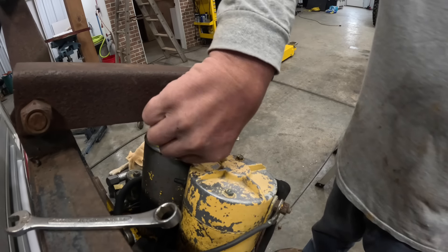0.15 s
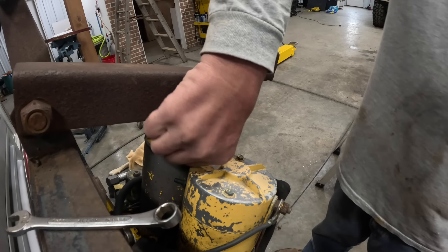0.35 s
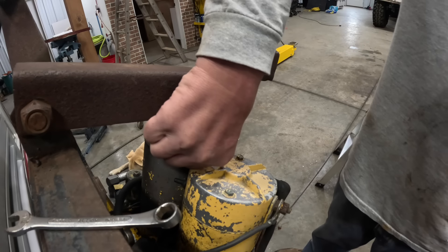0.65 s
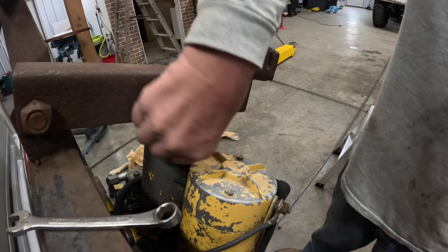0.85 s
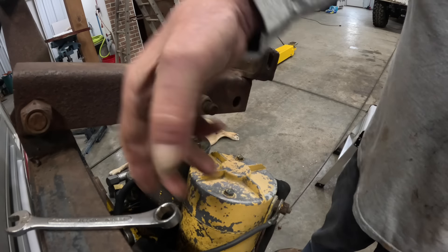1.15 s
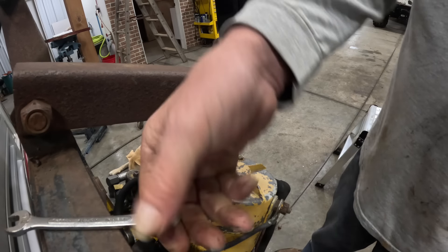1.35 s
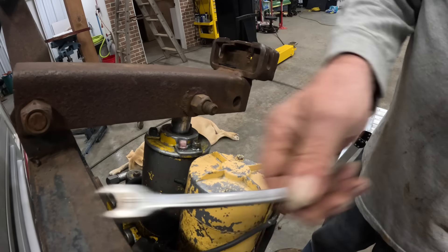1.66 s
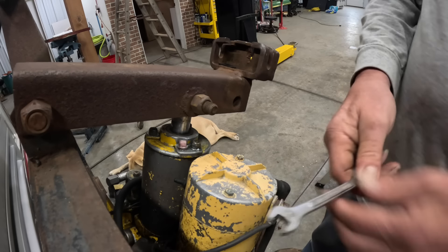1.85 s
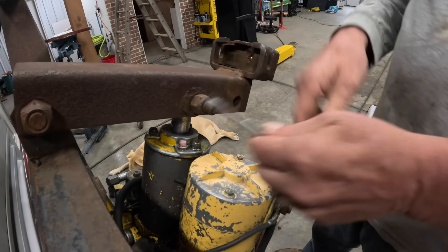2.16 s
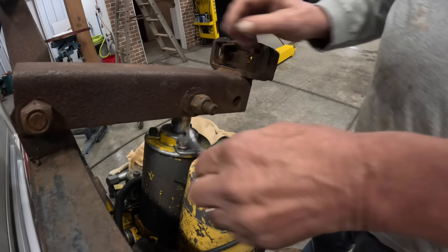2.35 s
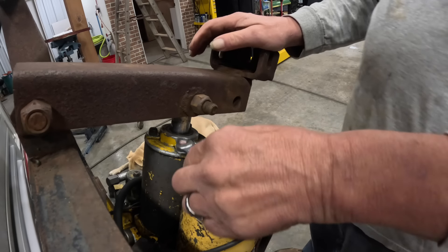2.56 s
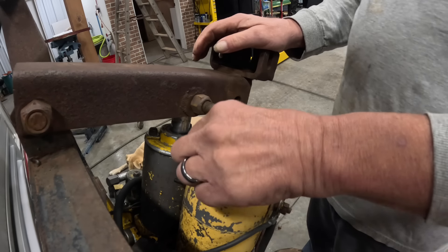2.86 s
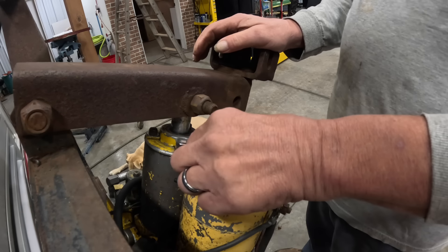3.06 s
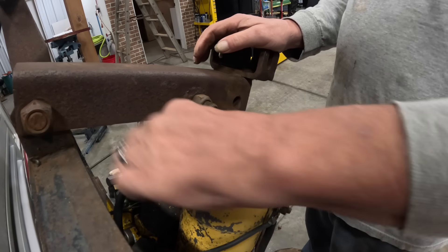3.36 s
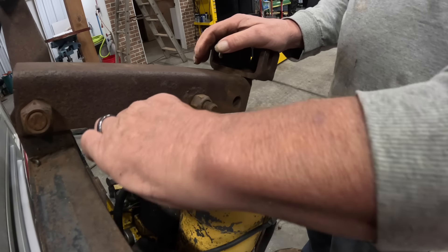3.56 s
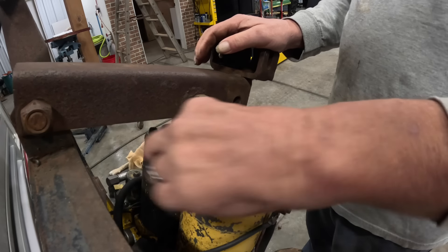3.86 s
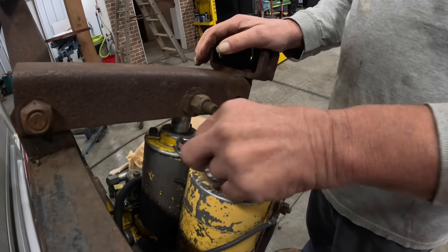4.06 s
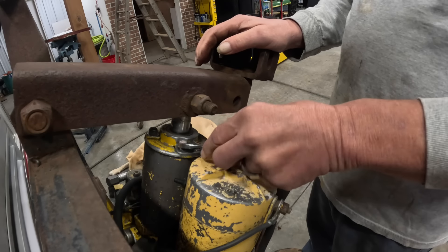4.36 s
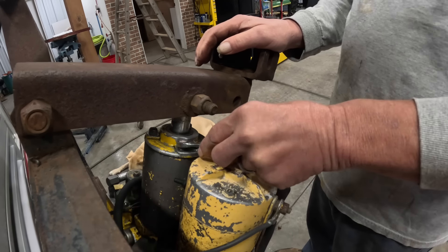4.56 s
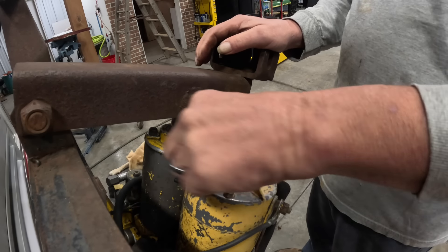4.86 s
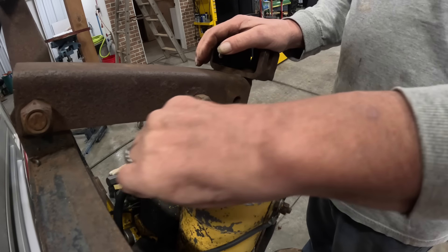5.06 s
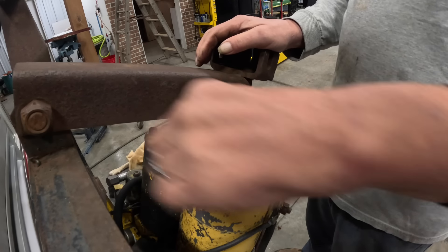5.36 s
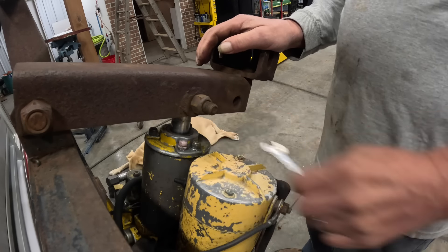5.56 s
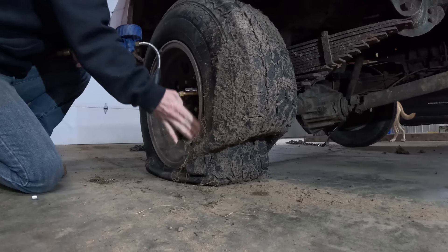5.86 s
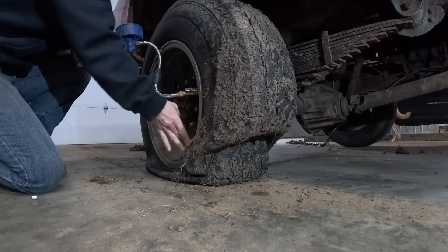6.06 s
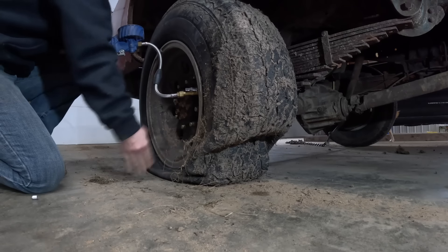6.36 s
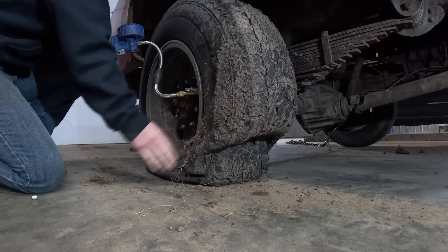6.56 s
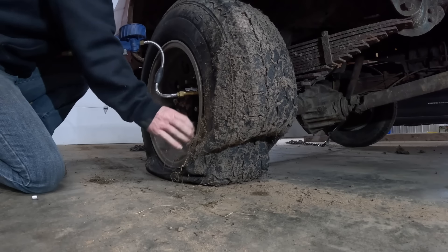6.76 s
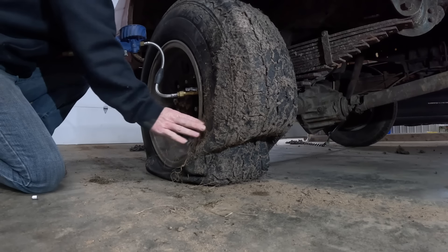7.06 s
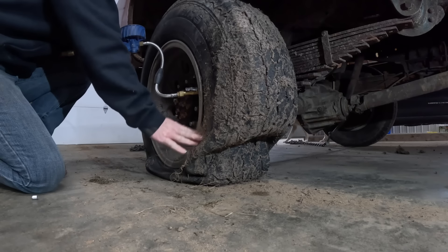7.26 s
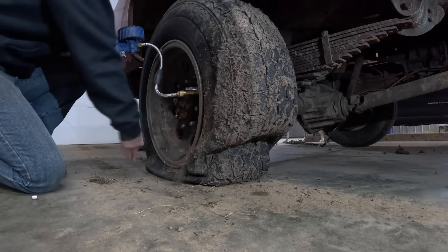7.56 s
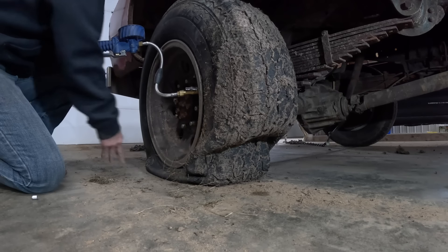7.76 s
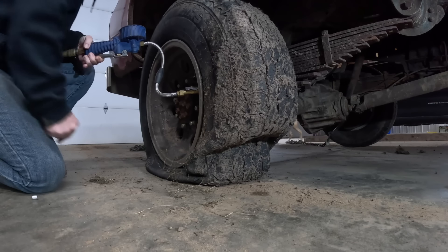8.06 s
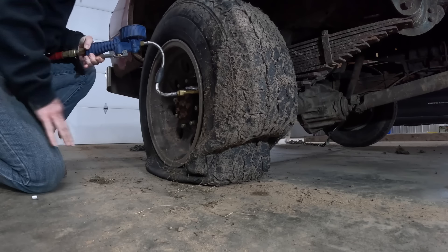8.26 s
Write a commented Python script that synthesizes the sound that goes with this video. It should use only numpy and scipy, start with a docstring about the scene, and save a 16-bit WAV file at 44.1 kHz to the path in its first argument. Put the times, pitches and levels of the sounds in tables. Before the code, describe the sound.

In a hard-walled garage a low machine hums steadily while sleeves brush and a wrench rattles as it is picked up, then clinks and knocks against a jack, loudest twice. At a sudden cut the hum vanishes; air spits and squeals sharply past a muddy tire bead, then settles into a fading, steady hiss. A palm scuffs down the rubber and bumps the wheel. Close stereo microphones.

```python
"""In a garage a machine hums while hands work a wrench on a bottle jack: sleeves rustle, steel clinks and knocks.
The hum stops dead as the scene changes to a flat truck tire: air hisses out past the bead, spits and squeals
where a hand feels for the leak, and later the hand slides down the muddy rubber and bumps the wheel.
The hum is a stack of wavering sines, the steel is decaying modes and noise cracks, and the air, cloth and
rubber are coloured noise under moving envelopes."""
import sys
import numpy as np
from scipy import signal
from scipy.fft import rfft, irfft, next_fast_len
from scipy.io import wavfile

SR = 44100
rng = np.random.default_rng(int(sys.argv[2]) if len(sys.argv) > 2 else 0)


def log_audio(samples):
    """Write samples as a 16-bit WAV file to the path given in sys.argv[1]."""
    # one column per channel
    frames = np.atleast_2d(samples).T
    # limit to full scale, then quantise
    limited = np.clip(frames, -1, 1)
    pcm = np.round(limited * 32767).astype(np.int16)
    wavfile.write(sys.argv[1], SR, pcm)


N = 371322
TIME = np.arange(N) / SR
FFT_SIZE = next_fast_len(N, True)
FREQS = np.maximum(np.fft.rfftfreq(FFT_SIZE, 1 / SR), 1)
CHANGE_S = 5.726  # cut from jack to tire

# Sines of the machine hum: multiple of the turning rate, level/dB
HUM = [(11, -69.5), (13, -67.5), (22, -72.5), (30, -57.5), (36, -67), (37, -64.5), (39, -72.5), (40, -68),
       (41, -74.5)]
TURN_HZ = 16.655
# How fast each hum sine wavers: f/Hz, relative level/dB
WAVER_COLOUR = [(1, 39.5), (3, -5.0), (12, -10.0), (100, -100)]
# Colour of the low air the machine moves: f/Hz, relative level/dB
RUMBLE = [(20, -4.5), (70, -11.5), (110, -22), (150, -0.5), (190, 3), (240, -1), (300, -8.5), (470, -9.5),
          (680, -10.5), (850, -32), (1200, -56)]
# Colour of the garage air: f/Hz, relative level/dB
ROOM_AIR = [(470, -43), (800, -2.5), (938, -3.5), (1110, 5.5), (1550, -1), (3050, -1.5), (3380, 2),
            (3660, -6), (5420, -9.5), (7640, -5.5), (13800, -25.5), (15000, -16.5)]
# Colour of the low bed beside the tire: f/Hz, relative level/dB
FLOOR = [(20, 4), (45, 10.5), (85, -9), (130, 2), (180, 1.5), (300, 9), (450, -8.5), (700, -40),
         (1200, -15)]
# Soft low bumps: t/s, length/s, level/dB, centre f/Hz
BUMPS = [(0.01, 0.1, -49.5, 68), (.25, 0.14, -55, 57), (.85, 0.19, -59.5, 62), (6.158, 0.07, -56, 32.6)]

# Sleeves brushing past: t/s, length/s, level/dB, centre f/Hz, width/octaves
SLEEVES = [(0.176, 0.43, -65, 1880, 1.6), (0.49, 0.13, -70, 3000, 0.46), (0.901, 0.047, -61, 2500, 0.67),
           (1.947, 0.17, -64.5, 2780, 2.3), (2.26, 0.17, -69, 3400, 2.8), (2.599, 0.053, -59.5, 1730, 1.4)]
# Skin sliding and squeaking on steel: t/s, length/s, level/dB, centre f/Hz, width/octaves
SKIN_SLIDES = [(0.2, 0.029, -64.5, 8340, 0.28), (0.951, 0.032, -66.5, 8800, 0.21),
               (2.595, 0.047, -61.5, 7400, 0.28), (2.831, 0.077, -64, 8400, 0.23),
               (4.29, 0.53, -76, 9000, 0.21)]
# Wrench scraping into place: t/s, length/s, level/dB
SCRAPES = [(2.98, 0.29, -63.5)]
# Small dry ticks: t/s, level/dB before the common trim
TICKS = [(.2079, -47.5), (.7583, -49), (.9514, -50), (1.925, -49), (3.0525, -51), (4.045, -45),
         (4.322, -51), (4.505, -51), (4.6029, -51)]
KNOCK_TICK_DB = -4.5  # tick that starts a knock, against the knock's own level
# Dull knocks of tool and hand: t/s, level/dB, t60/s, centre f/Hz, width/octaves,
# left minus right/dB before the stereo balance
KNOCKS = [(3.053, -40.5, 0.095, 736, 0.32, -1), (3.06, -44, 0.31, 398, 0.71, -8.5),
          (3.166, -53, 0.082, 500, 0.95, -4), (4.2473, -49, .08, 766, 0.18, -3),
          (4.4234, -51.5, 0.073, 760, 0.36, -7.5), (5.238, -49, 0.09, 897, 0.84, -3)]

# Wrench chattering as it is picked up: start, spread of the contacts, level of the first
RATTLE_S, RATTLE_LENGTH_S, RATTLE_DB, RATTLE_T60_S = 1.4635, 0.025, -47.5, 0.083
# Ring of the loose steel: f/Hz, level/dB
RATTLE_RING = [(888, -4), (1540, -10), (1992, -13), (5378, -18), (7386, -17), (11500, -23), (12500, -27)]

# Wrench against jack: t/s, level/dB, brightness/(dB per octave), share of the jack (0-1),
# main bending modes/dB, upper bending modes/dB, top treble/dB
CLINKS = [(2.7732, -48, 0, 0, 1, 0, -6), (3.6948, -54.5, -5, 0, 6, 0, 5), (3.7412, -21, 0, 0, 4, 1, -13),
          (3.7502, -11, 3, 0.54, -1.5, 1, -3.5), (4.046, -43, -5.5, 0, 8.5, -6, 2),
          (4.361, -45.5, -3.5, 0.13, 3, 1, 0.5), (5.2235, -35, 2, 0.08, 4, -0.5, -3),
          (5.2861, -18.5, 2, 0.2, -2.5, -6, 2.5)]
# Modes of the hand-held wrench: f/Hz, level/dB, t60/s (up to 0.13 s it is scaled at each clink)
WRENCH_MODES = [(1333, -16.5, 0.071), (2260, -9, 0.049), (3548, -3, 0.057), (6350, -10, 0.096),
                (6500, -23, 0.65), (6780, 1.5, 0.036), (6930, 2.5, 0.016), (8480, -5.5, 0.016),
                (10770, -21, 0.013)]
# Modes of the jack and its steel arm: f/Hz, level/dB, t60/s
JACK_MODES = [(2280, -36, 0.32), (3500, -33, 0.93), (4740, -18, 0.18)]
# The jack's many weak modes, too dense to tell apart
SCATTER_DB, SCATTER_T60_S, SCATTER_HZ, SCATTER_OCTAVES = -32.5, 0.36, 3200, 1.5
# Scale of the short ring times; its change in dB per dB/octave, so bright contacts are short
RING_LENGTH, RING_PER_BRIGHTNESS = 0.84, -0.78
# Long modes after a full-scale blow; dB per dB of blow, so hard blows break free of the grip
FREE_DB, FREE_FOLLOWS = -6, 0.36
CLUSTER_SPREAD_HZ = 32.3  # close modes within this distance beat unevenly
TOP_TREBLE_HZ = 8000
# Dull knock under every clink: level under a full-scale blow, dB per dB of blow, decay, pitch, width
THUD_DB, THUD_FOLLOWS, THUD_T60_S, THUD_HZ, THUD_OCTAVES = -51, 0.12, 0.11, 1060, 1

# Hand and cloth bumping the wheel: t/s, level/dB, t60/s, centre f/Hz, width/octaves,
# left minus right/dB before the stereo balance
WHEEL_TAPS = [(7.492, -36.5, 0.14, 880, 0.45, 2), (7.821, -51, 0.14, 1186, 0.44, -1)]
# Colour of the palm sliding on rubber: f/Hz, relative level/dB
SLIDE_COLOUR = [(70, -50), (115, -5), (180, 3), (300, -5.5), (480, 3), (700, -15), (1050, -7),
                (1800, -15.5), (8000, -17), (14000, -33)]
# Palm catching and slipping: t/s, lift/dB
SCUFFS = [(7.275, 5.5), (7.355, 3.5), (7.391, 4), (7.428, 4), (7.456, 4), (7.488, 4)]
SCUFF_LENGTH_S = 0.013
# The slide swells until the hand lands
SLIDE_START_S, SLIDE_END_S, SLIDE_ATTACK_S, SLIDE_RELEASE_S = 7.21, 7.495, 0.037, 0.021
SLIDE_END_DB, SLIDE_RISE_DB_PER_S = -43.5, 64
LANDING_S, LANDING_LENGTH_S, LANDING_DB, LANDING_HZ, LANDING_OCTAVES = 7.496, 0.01, -35.5, 288, 2.15

# Hoarse squeal of the gap as the fingers move: t/s, pitch f/Hz, level/dB
SQUEAL = [(5.865, 1500, -40), (5.889, 1112, -30), (5.908, 914, -35), (5.925, 783, -34.5),
          (5.943, 729.4, -37), (5.957, 752, -32), (5.968, 631, -39.5), (5.981, 558, -29), (6.01, 635, -48)]
# Overtones of the squeal: multiple of the pitch, level/dB
SQUEAL_TONES = [(2, -3.5), (3, -7), (4, 2), (5, -5), (6, -12)]
SQUEAL_JITTER, SQUEAL_SPUTTER_DB = 0.009, 4.5  # rms share of the pitch, rms swing of each overtone
# Spits snapping through the mud: t/s, level/dB
SNAPS = [(5.8748, -16), (5.8755, -17), (5.8781, -13.5), (5.8804, -13.5), (5.8888, -14), (5.8897, -13)]
# Spurts at the bead: t/s, fade length/s, level/dB, centre f/Hz
SPURTS = [(5.788, .003, -33, 6300), (5.878, 0.013, -22, 3200), (5.89, 0.0022, -23, 4020),
          (5.909, 0.025, -31.5, 3420), (5.956, 0.025, -34, 2670), (5.978, 0.015, -29.5, 2500),
          (6.002, 0.0037, -23.5, 2220), (6.017, 0.01, -35, 2600)]
# A spurt this loud is all spits; their power share falls by this many dB per dB
SPIT_FULL_DB, SPIT_FOLLOWS, SPITS_PER_S = -15, 0.85, 1900

# Colour of the dull underside of the hiss: f/Hz, relative level/dB
JET_RUMBLE = [(60, -33), (120, -7), (180, 6), (290, -4), (540, -2), (700, -6.5), (1000, -2.5), (1500, -32)]
# Escaping air, one row each for mid range, core and treble:
# surge level/dB at its start, fall/(dB per s), steady level/dB, lift/dB once the arm is out of the way
LEAK = [(-43.5, 16, -57, 3), (-37, 17.5, -55, 0.6), (-45, 13, -54.5, 1)]
# Basic colour of the hiss: f/Hz, relative level/dB
HISS = [(350, -33), (600, -29.5), (788, -29), (843, -16.5), (953, -16.5), (1200, -5), (1580, 0), (1730, -3),
        (2120, -2), (3370, 4), (5810, -1.5), (7530, -3), (8860, -1.5), (10600, -20), (15500, -24)]
# Hollows of wheel and tire: f/Hz, width/Hz, lift in the surge/dB, lift in the steady hiss/dB
HOLLOWS = [(851, 24, 4, 11), (1546, 96, -5, 4.5), (2047, 160, 0, 7), (2256, 34, -1, 8),
           (3050, 58, 6.5, -5.5), (3370, 130, 3, -2), (4110, 550, 3.5, -1.5), (7400, 1040, 8.5, 2)]
ARM_AWAY_S, ARM_MOVE_S = 7.78, 0.68  # middle and length of the arm's move
COLOUR_SHIFT_S, COLOUR_SHIFT_LENGTH_S = 6.73, 0.9  # middle and length of the shift to the steady colour
# Treble hiss thrown back by the passing hand; dB per dB of the slide
DEFLECTED_DB, DEFLECTED_FOLLOWS = -52.5, 0.42

# Stereo balance at the jack: f/Hz, left minus right level/dB
JACK_BALANCE = [(60, -1), (150, -1.5), (380, 4.5), (950, 3), (2400, 2), (7000, 0), (9500, 2), (12000, 7.5)]
# Stereo balance at the tire: f/Hz, left minus right level/dB
TIRE_BALANCE = [(110, -1), (200, -3.5), (700, -3.5), (1290, -1.5), (2380, -2), (4400, 0), (8120, -3),
                (15000, 8.5)]
# Phase lead of the left microphone beside the tire: f/Hz, lead/rad
TIRE_LEAD = [(400, -0.19), (1300, -0.31), (2600, -0.34), (3300, -0.55), (4000, -0.038), (12000, -0.0016)]
# Treble loss of the microphones: f/Hz, level/dB
MIC_DULLING = [(12500, -0.5), (14000, -7.0), (15500, -11.0)]
CUTOFF_HZ = 15300


def from_db(db):
    """Decibels to gain."""
    return 10 ** (np.asarray(db) / 20)


def rms_one(x):
    """Scale to unit rms."""
    return x / np.sqrt(np.mean(x ** 2) + 1e-20)


def colour(points):
    """Gain at every frequency, drawn through (Hz, dB) points on a log axis."""
    hz, db = np.transpose(points)
    return from_db(np.interp(np.log(FREQS), np.log(hz), db))


def shaped(x, gain):
    """Filter by a gain at every frequency."""
    return irfft(rfft(x, FFT_SIZE) * gain, FFT_SIZE)[..., :N]


def stereo_white(side_db, size=N):
    """White noise, mostly common to both ears; side_db sets the width."""
    mid, side = rng.standard_normal((2, size))
    return mid + from_db(side_db) * side * [[1], [-1]]


def cut(x, order, hz, kind="low"):
    """Butterworth filter."""
    return signal.sosfilt(signal.butter(order, hz, kind, fs=SR, output="sos"), x)


def band(x, hz, octaves, order=2):
    """Band-pass about a centre."""
    edges = hz * 2 ** (np.array([-.5, .5]) * octaves)
    return cut(x, order, np.minimum(edges, [.4 * SR, .45 * SR]), "band")


def add(out, s, sound):
    """Mix a short sound in at a time."""
    start = round(s * SR)
    first, last = max(start, 0), min(start + sound.shape[-1], N)
    out[:, first:last] += sound[..., first - start:last - start]


def drift(hz):
    """Random wander slower than about one rate, rms 1."""
    return rms_one(shaped(rng.standard_normal(N), 1 / (1 + (FREQS / hz) ** 4)))


def swells(rows, hz, octaves, grain_db, side_db):
    """Soft contacts: grainy noise about one pitch that swells and fades."""
    power = sum(from_db(2 * db) * np.exp(-4 * ((TIME - s) / length) ** 2) for s, length, db in rows)
    # the grain level jumps every 50 samples
    grains = from_db(grain_db * rng.standard_normal(N // 50 + 1)).repeat(50)[:N]
    return np.sqrt(power) * rms_one(band(stereo_white(side_db) * grains, hz, octaves))


def garage(x, t60, wet_db):
    """Diffuse tail of the hard-walled room: decaying noise, different at each ear."""
    t = TIME[:SR]
    tail = cut(rng.standard_normal((2, SR)) * from_db(-60 * t / t60) * (t > .006), 2, 7000)
    return x + from_db(wet_db) * signal.fftconvolve(x, rms_one(tail) / np.sqrt(SR), axes=1)[:, :N]


def placed(x, balance, lead=None):
    """Each frequency reaches one microphone louder, and perhaps sooner."""
    log_ratio, radians = np.log(colour(balance)), 0
    if lead:
        hz, radians = np.transpose(lead)
        radians = np.interp(np.log(FREQS), np.log(hz), radians)
    # half of the difference goes to each side
    return shaped(x, np.exp((log_ratio + 1j * radians) * np.array([[.5], [-.5]])))


def machine(waver=0.23, rumble_db=-56.5, air_db=-67, air_swing_db=1.5):
    """Sines on multiples of one turning rate waver in level and phase over the rumble of moved air."""
    hum = np.zeros((2, N))
    slow = colour(WAVER_COLOUR)
    for multiple, db in HUM:
        swell, sway = waver * rms_one(shaped(rng.standard_normal((2, N)), slow))
        phase = 2 * np.pi * (round(multiple) * TURN_HZ * TIME + rng.random()) + sway
        tone = np.sin(phase + np.array([[.25], [-.25]]))  # left leads right by half a radian
        hum += np.sqrt(2) * from_db(db) * (1 + swell) * tone
    rumble = rms_one(shaped(stereo_white(-15.0), colour(RUMBLE) * (FREQS < 1500)))
    air = rms_one(shaped(stereo_white(-4.5), colour(ROOM_AIR)))
    return hum + from_db(rumble_db) * rumble + from_db(air_db + air_swing_db * drift(6.9)) * air


def tire_floor(floor_db=-71.0):
    """Steady, low coloured noise beside the tire."""
    return from_db(floor_db) * rms_one(shaped(stereo_white(-9.0), colour(FLOOR)))


def low_bumps():
    """Soft swells of very low noise."""
    return sum(swells([bump], hz, 1.3, grain_db=-2.0, side_db=-14) for *bump, hz in BUMPS)


def rubs():
    """Sleeves, skin and the wrench slide over the steel as grainy noise."""
    sleeves = sum(swells([brush], hz, octaves, grain_db=4.0, side_db=-6.5)
                  for *brush, hz, octaves in SLEEVES)
    skin = sum(swells([slide], hz, octaves, grain_db=4.0, side_db=-31)
               for *slide, hz, octaves in SKIN_SLIDES)
    scrape = swells(SCRAPES, 1190, 0.3, grain_db=-2.5, side_db=-8.0)
    return sleeves + skin + scrape


def ticks(tick_db=-9, tick_t60=0.049):
    """Nails and ring touch the steel lightly, alone and at the start of each knock."""
    out, t = np.zeros((2, N)), TIME[:SR // 4]
    knock_ticks = [(s, db + KNOCK_TICK_DB) for s, db, *_ in KNOCKS]
    for s, db in list(TICKS) + knock_ticks:
        tick = rms_one(band(stereo_white(-24.0, size=len(t)), 7460, 0.58))
        add(out, s, from_db(db + tick_db - 60 * t / tick_t60) * tick)
    return out


def knocks(rows):
    """Damped blows on a heavy body: decaying noise stands for dense modes about one tone."""
    out, t = np.zeros((2, N)), TIME[:SR]
    for s, db, t60, hz, octaves, pan_db in rows:
        body = band(stereo_white(-10.0, size=SR), hz, octaves, order=1)
        body = band(body, hz, 2.9, order=1)  # trims the far skirts
        add(out, s, from_db(db - 60 * t / t60 + pan_db * np.array([[.5], [-.5]])) * rms_one(body))
    return out


def clink_thuds():
    """The dull knock under every clink, only slightly louder under a harder blow."""
    return knocks([(s, THUD_DB + THUD_FOLLOWS * db, THUD_T60_S, THUD_HZ, THUD_OCTAVES, 0)
                   for s, db, *_ in CLINKS])


def rattle(thud_t60=0.057, thud_hz=1080, crack_db=-11, crack_hz=6000, count=5):
    """A quick, uneven run of contacts, each a thud, a crack and a fresh ring of the loose steel."""
    out, t = np.zeros((2, N)), TIME[:SR // 4]
    for k in range(count):
        uneven = (k > 0) * rng.uniform(-0.42, 0.37)
        s = RATTLE_S + RATTLE_LENGTH_S * (k + uneven) / (count - 1)
        db = RATTLE_DB - k  # each contact 1 dB weaker
        thud = (s, db, thud_t60, thud_hz, 1, 0)
        crack = (s, db + crack_db, thud_t60 / 2, crack_hz, 1, 0)
        out += knocks([thud, crack])
        ring = sum(from_db(mode_db + rng.normal(0, 1.7)) * np.sin(2 * np.pi * (hz * t + rng.random()))
                   for hz, mode_db in RATTLE_RING)
        add(out, s, from_db(db - 60 * t / RATTLE_T60_S) * ring)
    return out


def cluster(hz, t, count=5):
    """Several modes lying close together and beating, as strong as one."""
    detune, phase = rng.uniform(-1, 1, (2, count, 1))
    tones = np.sin(2 * np.pi * ((hz + CLUSTER_SPREAD_HZ * detune) * t + phase))
    return tones.sum(0) / np.sqrt(count)


def wrench(crack_db=-10, crack_t60=0.031, modes_db=-6, top_hz=12800):
    """Each contact is a short crack and rings wrench and jack; a firm grip stops the long modes."""
    out, t = np.zeros((2, N)), TIME[:SR * 3 // 4]
    for s, db, tilt_db, into_jack, bend_db, upper_db, treble_db in CLINKS:
        length = RING_LENGTH * from_db(RING_PER_BRIGHTNESS * tilt_db)
        free = from_db(FREE_DB + FREE_FOLLOWS * db)
        crack = rms_one(band(stereo_white(-3.6, size=len(t)), 5500 * from_db(tilt_db), 2.9))
        dull, sharp = [cut(crack, 5, TOP_TREBLE_HZ, side) for side in ("low", "high")]
        sound = from_db(crack_db - 60 * t / crack_t60) * (dull + from_db(treble_db) * sharp)
        scatter = rms_one(band(stereo_white(-8, size=len(t)), SCATTER_HZ, SCATTER_OCTAVES))
        sound += into_jack * from_db(SCATTER_DB - 60 * t / SCATTER_T60_S) * scatter
        modes = [(hz, mode_db, t60, free) if t60 > .13 else (hz, mode_db, t60 * length, 1)
                 for hz, mode_db, t60 in WRENCH_MODES]
        modes += [(*mode, into_jack) for mode in JACK_MODES]
        for hz, mode_db, t60, share in modes:
            lasting = t60 > .2
            # a mode is weak when the shank is struck near one of its nodes
            place_db = bend_db * (3300 < hz < 3800) + treble_db * (hz > TOP_TREBLE_HZ)
            place_db += upper_db * (6000 < hz < 7500 and not lasting)
            slope_db = tilt_db * np.log2(hz / 5000)
            chance_db = rng.normal(0, 1, (2, 1))  # per ear
            strength = share * from_db(modes_db + mode_db + place_db + slope_db + chance_db)
            tone = cluster(hz, t) if lasting else np.sin(2 * np.pi * (hz * t + rng.random()))
            sound += strength * from_db(-60 * t / t60) * tone
        add(out, s, from_db(db) * sound * np.minimum(t / 0.00042, 1))  # 0.42 ms attack
    return cut(out, 8, top_hz)


def slide_effort():
    """Strength of the hand's slide, 0-1: attack, steady crescendo, quick release."""
    attack = np.clip((TIME - SLIDE_START_S) / SLIDE_ATTACK_S, 0, 1)
    crescendo = from_db(SLIDE_RISE_DB_PER_S * np.minimum(TIME - SLIDE_END_S, 0))
    return attack * crescendo * np.exp(-np.maximum(TIME - SLIDE_END_S, 0) / SLIDE_RELEASE_S)


def hand_on_tire(lowest_hz=145):
    """A palm drags over caked rubber in uneven scuffs, a low rush, and lands with a soft thump."""
    scuffs_db = sum(lift_db * np.exp(-((TIME - s) / SCUFF_LENGTH_S) ** 2) for s, lift_db in SCUFFS)
    rubbing = rms_one(shaped(stereo_white(-37), colour(SLIDE_COLOUR)))
    rush = from_db(SLIDE_END_DB + scuffs_db) * slide_effort() * rubbing
    landing = swells([(LANDING_S, LANDING_LENGTH_S, LANDING_DB)], LANDING_HZ, LANDING_OCTAVES,
                     grain_db=1.5, side_db=-26)
    return cut(rush + landing, 4, lowest_hz, "high")


def tire_boom(x, hz=172, octaves=0.65, t60=0.84, boom_db=-29):
    """The air inside the tire rumbles on after each touch: a decaying low noise tail for close modes."""
    ring = rms_one(band(rng.standard_normal(SR), hz, octaves) * from_db(-60 * TIME[:SR] / t60))
    return x + from_db(boom_db) * signal.fftconvolve(x, ring[None] / np.sqrt(SR), axes=1)[:, :N]


def squeal(lowest_hz=1150):
    """Air sets the rubber gap fluttering at an unsteady, mostly sinking pitch; each overtone sputters alone."""
    out, (s, hz, db) = np.zeros((2, N)), np.transpose(SQUEAL)
    t = np.arange(s[0], s[-1], 1 / SR)
    jitter = rms_one(band(rng.standard_normal(SR), 190, 4.7))[-len(t):]
    pitch = np.interp(t, s, hz) * (1 + SQUEAL_JITTER * jitter)
    phase, tone = 2 * np.pi * np.cumsum(pitch) / SR, 0
    for multiple, tone_db in SQUEAL_TONES:
        sputter = SQUEAL_SPUTTER_DB * rms_one(band(rng.standard_normal(SR), 51, 2.0))[-len(t):]
        overtone = np.sin(round(multiple) * phase + 2 * np.pi * rng.random())
        tone = tone + from_db(tone_db + sputter) * overtone
    add(out, s[0], from_db(np.interp(t, s, db)) * rms_one(cut(tone, 4, lowest_hz, "high")))
    return out


def snaps(hz=3900):
    """Single sharp pressure spikes as mud lets go of the gap."""
    out, t = np.zeros((2, N)), TIME[:SR // 1000] - .0005
    spread = (np.pi * hz * t) ** 2
    for s, db in SNAPS:
        add(out, s + t[0], from_db(db) * (1 - 2 * spread) * np.exp(-spread))
    return out


def spurts(octaves=1.4, grain_db=6, lowest_hz=1150, highest_hz=7800):
    """Air bursts past the muddy bead in short gusts; the stronger the gust, the more it spits."""
    out, t = np.zeros((2, N)), TIME[:SR] - .5
    for s, length, db, hz in SPURTS:
        clicks = (rng.random(SR) < SPITS_PER_S / SR) * rng.choice([-1, 1], SR)
        spits = clicks * from_db(grain_db * np.minimum(rng.exponential(1, SR), 2))
        share = min(from_db(SPIT_FOLLOWS * (db - SPIT_FULL_DB)), 1)
        flow = np.sqrt(1 - share) * stereo_white(-35, size=SR) + np.sqrt(share) * rms_one(spits)
        flow = cut(band(flow, hz, octaves, order=1), 4, [lowest_hz, highest_hz], "band")
        add(out, s - .5, from_db(db) * np.exp(-np.abs(t) / length) * rms_one(flow))
    return out


def leak_gain(surge_db, fall_db_per_s, steady_db, lift_db):
    """The surge dies away onto the steady hiss, which opens up as the arm leaves."""
    surge = from_db(surge_db - fall_db_per_s * np.maximum(TIME - CHANGE_S, 0))
    uncovered = np.clip((TIME - ARM_AWAY_S) / ARM_MOVE_S + .5, 0, 1)
    return np.hypot(surge, from_db(steady_db + lift_db * uncovered))


def jet_rumble(below_db=-19):
    """The dull underside of the hiss follows the strength of its core."""
    rumble = rms_one(shaped(stereo_white(-6.0), colour(JET_RUMBLE)))
    return from_db(below_db) * leak_gain(*LEAK[1]) * rumble


def underbody(x, echo_db=-5, count=30):
    """Floor, axle and truck bed throw back close echoes that ripple the hiss."""
    out = x.copy()
    for delay in rng.uniform(.002, .05, count):
        add(out, delay, x * from_db(echo_db) / np.sqrt(count) * rng.choice([-1, 1]))
    return out / np.sqrt(1 + from_db(2 * echo_db))


def leak():
    """Jet noise coloured by the wheel; its core sinks fastest and its hollows shift as the gap changes."""
    mids, core, treble = [leak_gain(*row) for row in LEAK]
    treble = np.hypot(treble, from_db(DEFLECTED_DB) * slide_effort() ** DEFLECTED_FOLLOWS)
    white, hiss = stereo_white(-57.0), 0
    low, high = 1 / (1 + (FREQS / 2550) ** 12), 1 / (1 + (5750 / FREQS) ** 12)
    parts = [(low, mids), (1 - low - high, core), (high, treble)]
    settled = np.clip((TIME - COLOUR_SHIFT_S) / COLOUR_SHIFT_LENGTH_S + .5, 0, 1)
    # crossfade from the surge's colour to the steady one
    for stage, weight in enumerate([1 - settled, settled]):
        lift_db = sum(lifts[stage] / (1 + (2 * (FREQS - hz) / width) ** 2)
                      for hz, width, *lifts in HOLLOWS)
        gain = colour(HISS) * from_db(lift_db)
        hiss = hiss + weight * sum(level * rms_one(shaped(white, gain * share)) for share, level in parts)
    return hiss


def scene():
    """First the jack, then at once the tire; the low bumps run through both."""
    steel = wrench() + rattle() + knocks(KNOCKS) + clink_thuds() + ticks()
    jack = machine() + garage(steel, t60=0.46, wet_db=-23.5) + rubs()
    touches = tire_boom(hand_on_tire() + knocks(WHEEL_TAPS))
    gusts = garage(spurts() + snaps() + squeal() + touches, t60=0.98, wet_db=-28.5)
    tire = underbody(leak()) + jet_rumble() + gusts + tire_floor()
    at_tire = np.clip((TIME - CHANGE_S) / 0.01 + .5, 0, 1)  # 10 ms crossfade
    jack_side = (1 - at_tire) * placed(jack, JACK_BALANCE)
    tire_side = at_tire * placed(tire, TIRE_BALANCE, TIRE_LEAD)
    return jack_side + tire_side + low_bumps()


def record(dry):
    """The microphones dull the highest treble, then the top is cut steeply."""
    dulled = shaped(dry, colour(MIC_DULLING))
    return signal.sosfilt(signal.ellip(10, .2, 80, CUTOFF_HZ, fs=SR, output="sos"), dulled)


dry = scene()
out = record(dry)
log_audio(out)
```